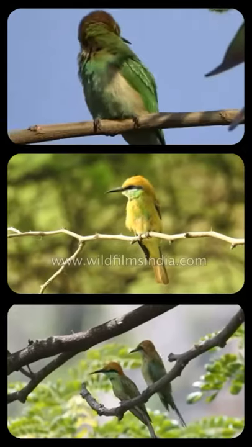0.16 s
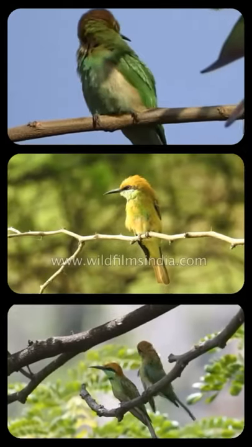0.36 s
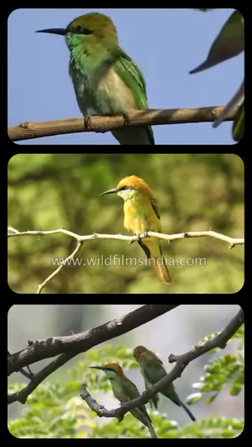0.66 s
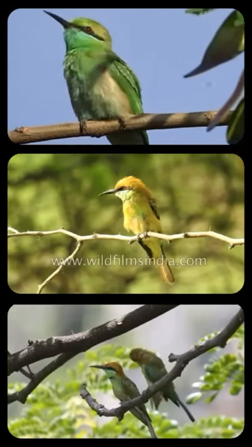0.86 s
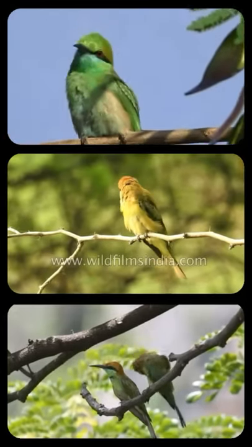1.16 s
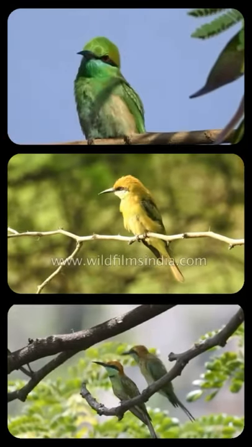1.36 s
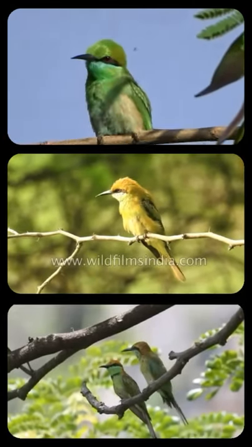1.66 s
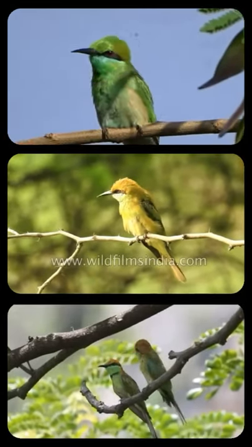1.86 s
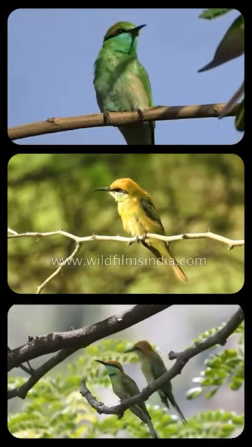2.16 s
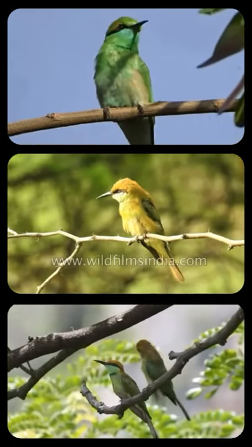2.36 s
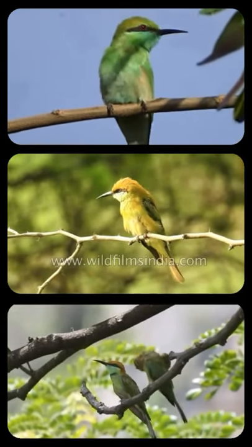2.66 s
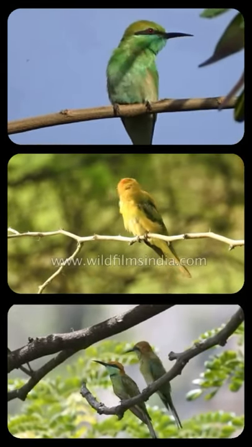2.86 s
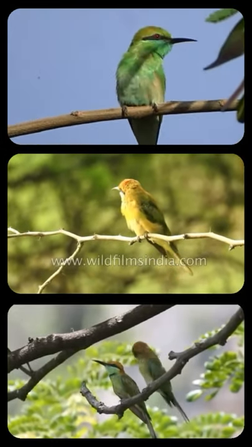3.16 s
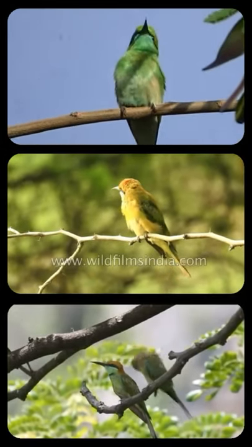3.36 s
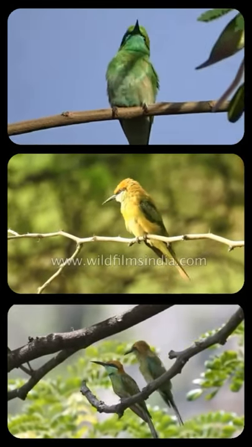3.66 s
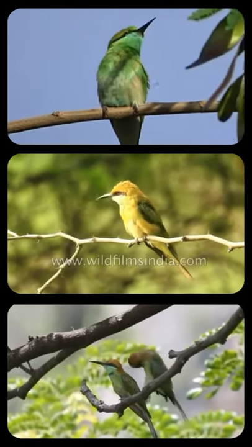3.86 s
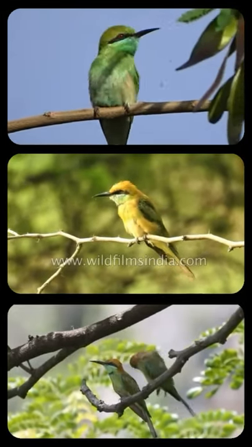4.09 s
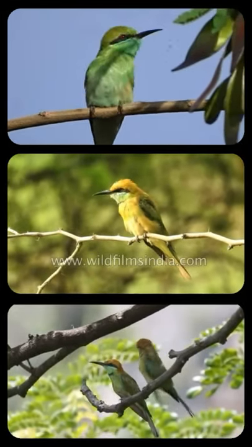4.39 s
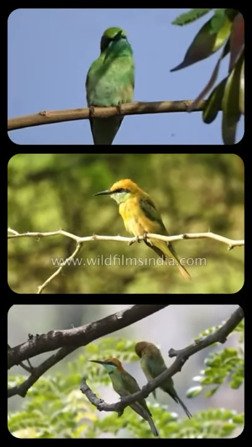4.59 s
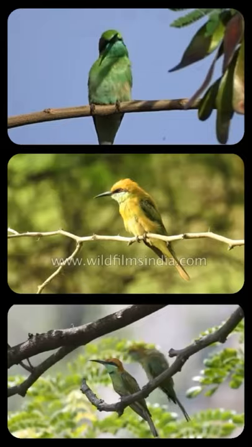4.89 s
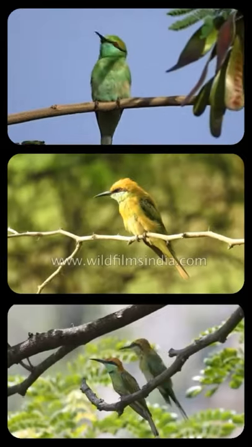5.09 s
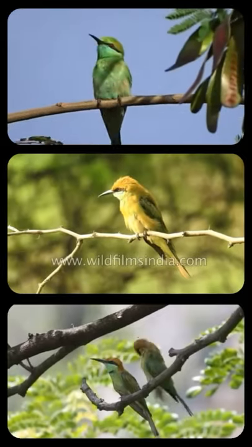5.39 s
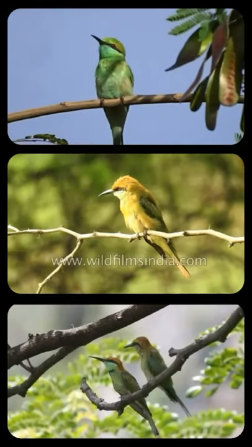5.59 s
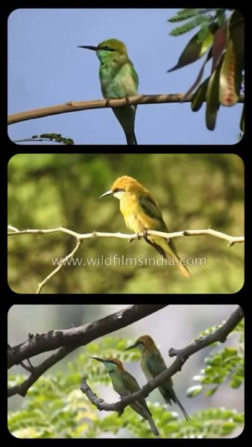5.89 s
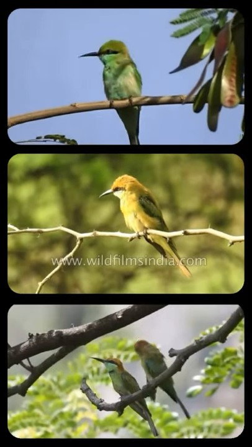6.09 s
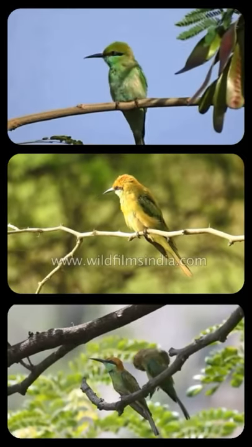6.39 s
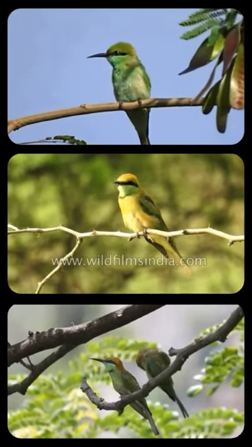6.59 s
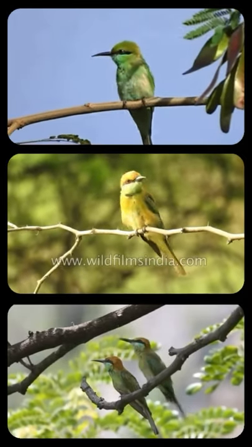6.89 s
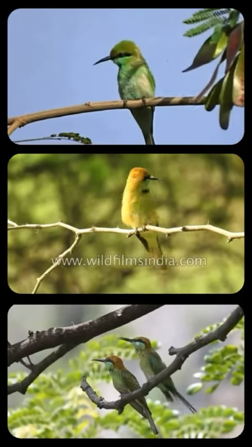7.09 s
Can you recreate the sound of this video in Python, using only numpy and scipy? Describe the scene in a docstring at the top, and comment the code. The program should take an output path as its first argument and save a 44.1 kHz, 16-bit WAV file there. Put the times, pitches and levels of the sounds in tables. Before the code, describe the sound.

An open-air grove with light echo off branches. Bright, burry whistled trills repeat in brief bursts, some overlapping fainter ones. Soft low coos sound far away at the start, and a thin arching whistle comes near the end. A twig knocks and leaves rustle briefly as the remote road noise swells, then eases a little. The centred, fairly close pickup has only faint hiss.

```python
"""Green bee-eaters call from a tree: quick trills of falling slurs that sink and fade, and a few double chips.
Each call is a wavering whistle with harmonics, shaped by the throat and blurred by echoes off branches.
Far birds coo and whistle faintly as gliding sine tones; small knocks, perhaps of a twig, and brief rustles
of leaves are short grainy noise. Distant traffic murmurs, slowly swells and eases again: shaped noise plus
a few unsteady engine tones. Under it all lies a faint hiss of smooth noise."""
import sys
import numpy as np
from scipy import signal
from scipy.fft import rfft, irfft, next_fast_len
from scipy.io import wavfile
from scipy.ndimage import uniform_filter1d, map_coordinates

SR = 44100
rng = np.random.default_rng(int(sys.argv[2]) if len(sys.argv) > 2 else 0)


def pcm_store(signal):
    """Save signal as 16-bit PCM."""
    levels = np.round(np.clip(np.atleast_2d(signal), -1, 1) * 32767)
    wavfile.write(sys.argv[1], SR, levels.astype(np.int16).T)


N = 319725
T = np.arange(N) / SR


def amp(db):
    """Turn decibels into gain."""
    return 10 ** (np.asarray(db) / 20)


def unit(x):
    """Scale a sound to rms 1."""
    return x / np.sqrt(np.mean(x ** 2) + 1e-20)


def along(points, hz):
    """Read (f/Hz, value) points at any frequency, on a log axis."""
    f, v = np.transpose(points)
    return np.interp(np.log(hz + 1), np.log(f + 1), v)


def curves(rows, t):
    """Read each column after the first at times t."""
    s, *cols = np.transpose(rows)
    return [np.interp(t, s, c) for c in cols]


def wobble(rate, size):
    """Draw a smooth random curve with `rate` random points a second."""
    knots = rng.standard_normal(2048)
    return map_coordinates(knots, [np.arange(size) * rate / SR], mode="wrap")


def filtered(x, response):
    """Multiply the spectrum of x by a function of frequency."""
    m = next_fast_len(N + 8192)
    return irfft(rfft(x, m) * response(np.fft.rfftfreq(m, 1 / SR)), m)[..., :N]


def add(track, s, x):
    """Mix x into the track from time s, cutting off what lies outside."""
    i = round(s * SR)
    x = x[max(-i, 0):N - i]
    track[max(i, 0):][:len(x)] += x


def bee_eaters():
    """All trills and chips, each with its own random set of branch echoes."""
    # trills: t/s, length/s, level/dB, pitch/Hz, effort (0 to 1), echo level against the voice/dB
    trills = [ (-.11, .13, -23.5, 2993, 0.42, -8.5), (.066, 0.12, -40, 3436, 0.1, -1),
              (.134, 0.11, -27.5, 3150, 0.81, -5), (0.285, 0.12, -35, 3472, 0.28, -2),
              (0.514, 0.11, -29.5, 3360, 0.23, -2.5), (.717, 0.14, -28.5, 3350, 0.3, 2),
              (0.983, 0.13, -28, 3380, 0.33, -2.5), (1.189, .12, -26, 3453, 0.31, -5),
              (1.273, 0.068, -34, 3860, 0.43, 8), (1.308, 0.14, -25.5, 3436, 0.56, 0),
              (1.477, 0.08, -26.5, 3445, 0.31, -4.5), (1.992, 0.14, -20, 3203, 0.98, -12),
              (2.85, .235, -25, 3554, 0.85, -9.5), (2.883, .11, -23.5, 3265, .25, -12),
              (3.16, 0.019, -37.5, 3710, 0.4, 1), (3.222, 0.14, -26.5, 3246, .7, -2),
              (3.302, .12, -34, 3200, 0.84, 5), (3.49, 0.16, -28, 3190, 0.55, -1),
              (3.545, 0.11, -29.5, 3380, 0.69, 0), (3.787, .14, -27, 3126, .7, 5),
              (3.883, 0.19, -38.5, 3020, 0, 10), (4.025, .125, -27, 3150, 0.47, 9),
              (4.07, .12, -32.5, 3310, 0.83, 10), (4.265, 0.15, -28, 3078, 0.3, 1.5),
              (4.323, .15, -32, 3247, 0.8, 3), (4.52, .2, -29, 3120, 0.61, 6),
              (4.588, 0.079, -23.5, 3744, 0.89, 2), (4.79, 0.13, -24.5, 3190, 0.64, 3),
              (5.007, 0.19, -35, 3280, 0.64, 13), (5.018, 0.13, -22.5, 3147, 0.51, 3),
              (5.234, .15, -34.5, 3373, 0.43, 9), (5.253, 0.11, -21.5, 3094, 0.46, 1.5),
              (5.462, .165, -25, 3120, .8, 6), (5.678, .15, -26.5, 3638, 0.53, 6),
              (5.688, .15, -30, 3234, .7, -3), (5.902, 0.13, -25.5, 3202, 0.44, 1.5),
              (6.11, 0.12, -25.5, 3208, .6, -1), (6.99, .16, -25, 3580, 0.78, -6.5), ]
    # double chips: t/s, low note length/s, level/dB, pitch/Hz, echo level against the voice/dB
    chips = [(1.568, .012, -25, 3130, -7.5), (1.651, 0.011, -24, 3180, -10.5),
             (6.713, .017, -27, 3476, -7.5)]
    out = np.zeros(N)
    for s, length, db, hz, effort, echo_db in trills:
        voice = trill(length, hz, np.clip(effort, .05, 1))
        add(out, s, amp(db) * branches(voice, echo_db))
    for s, low_s, db, hz, echo_db in chips:
        add(out, s, amp(db) * branches(chip(low_s, hz), echo_db))
    return out


def trill(length, hz, effort, attack=0.0024, release=0.0065):
    """One long slur, then quick ones; effort makes them taller, harsher for longer, and sink and fade more."""
    t = np.arange(int(length * SR)) / SR

    # the opening slur lasts 35 ms, or 29 % of a short call; effort spreads the later ones out
    first = min(.035, .29 * length)
    soft_gap_s, effort_gap_s = .0115, .0085
    gaps = (soft_gap_s + effort_gap_s * effort) * (1 + .05 * rng.standard_normal(24))
    starts = np.cumsum(np.append([.002, first], gaps))
    which = np.maximum(np.searchsorted(starts, t) - 1, 0)

    # each slur differs a little by chance, in loudness and in pitch
    chance = rng.standard_normal((2, len(starts)))[:, which]
    accent, scatter = uniform_filter1d(chance, size=64, axis=1)

    # between slurs the voice flicks down, weakest just before it rises again
    flick_s, flick_hz = .0024, 2000
    since = np.maximum(t - starts[which] - flick_s, 0)
    to_joint = np.abs(t[:, None] - starts).min(axis=1)
    joint = np.exp(-(to_joint / flick_s) ** 3)
    to_pause = np.abs(t[:, None] + flick_s - starts[1:]).min(axis=1)
    pause = np.exp(-(to_pause / flick_s) ** 2)
    harsh_s = .14  # length of the harsh opening at full effort
    force = np.exp(-(t / (harsh_s * effort)) ** 4)
    flick = joint * force

    # as the air pressure runs out, the slurs get lower, shallower and softer
    steady_share, spent_hz = 0.33, 2633  # share of the call before it sinks; where full effort sinks to
    spent = np.clip((t / length - steady_share) / (1 - steady_share), 0, 1)
    foot = hz + (spent_hz - hz) * effort * spent ** 1.3 + 45.5 * scatter
    hold_s, fade_db_per_s = 0.08, 118  # the level holds, then fades this fast at full effort
    fade_db = fade_db_per_s * effort * np.maximum(t - hold_s, 0)

    # each slur drops steeply and levels out on its foot; later slurs of higher voices glide longer
    first_fall_s, fall_s_at_3200_hz = .0048, .0065
    glide = np.where(t > first, fall_s_at_3200_hz * (hz / 3200) ** 4, first_fall_s)
    # once the harsh opening is over, the slurs shrink to a fine buzz
    height = (830 + 400 * effort) * (.7 + 0.34 * force)
    slur = foot + height * np.exp(-1.5 * spent - (since / glide) ** 1.296)
    pitch = slur + (flick_hz - slur) * flick

    gate = np.clip(t / attack, 0, 1) * np.clip((length - t) / release, 0, 1)
    level_db = -4.5 * joint - 4 * pause + 1.5 * accent - fade_db
    rasp_db = -35 + 16 * flick  # the flicks of the harsh opening are the raspiest
    return syrinx(pitch, octave_db=-11.5, rasp_db=rasp_db) * gate * amp(level_db)


def chip(low_s, hz, turn=0.00288, break_hz=2200, break_db_per_s=2600, attack=0.01, release=0.0052):
    """A rising low note and a falling high one; in the break between them the voice drops and dies away."""
    leap_ratio, leap_s, high_s = 1.39, .031, .01  # the high note: pitch ratio, delay, length
    rise_hz_per_s, sag_hz_per_s = 29000, 58000
    length = leap_s + high_s
    t = np.arange(int(length * SR)) / SR
    low = hz + rise_hz_per_s * (t - low_s / 2)
    high = hz * leap_ratio - sag_hz_per_s * (t - leap_s)
    note = np.where(t < (low_s + leap_s) / 2, low, high)
    # time to the nearer edge of the break, zero outside it
    into_break = np.maximum(np.minimum(t - low_s, leap_s - t), 0)
    pitch = note + (break_hz - note) * np.minimum(into_break / turn, 1)
    gate = np.clip(t / attack, 0, 1) * np.clip((length - t) / release, 0, 1)
    return syrinx(pitch, octave_db=-4, rasp_db=-30) * gate * amp(-break_db_per_s * into_break)


def syrinx(pitch, octave_db, rasp_db, jitter=0.0142):
    """The voice organ: an unsteady, raspy whistle whose harmonics sweep through the throat resonance."""
    # throat and open bill pass the whistle and damp what lies above and below: f/Hz, level/dB
    throat = [(1800, -11.5), (2400, -8.5), (3000, -2), (4400, -4), (5300, -10.5), (6400, -16), (8000, -20),
              (9800, -24), (12000, -33)]
    n = len(pitch)
    phase = 2 * np.pi * np.cumsum(pitch * (1 + jitter * wobble(707, n))) / SR
    tone = np.zeros(n)
    for k in range(1, 4):
        harmonic_db = octave_db * np.log2(k) + along(throat, k * pitch)
        tone += amp(harmonic_db) * np.sin(k * phase)
    # rasp: the same whistle with its strength shaken at random
    rasp = amp(rasp_db) * wobble(2900, n) * (np.sin(phase) + 0.69 * np.sin(2 * phase))
    return (tone + rasp) * amp(.6 * wobble(300, n))


def branches(x, echo_db, spread=.035, t60=0.12, count=90):
    """The voice plus copies scattered off nearby branches, at rms 1 over the length of the call."""
    delay = .002 + spread * rng.random(count)
    strength = rng.standard_normal(count) * amp(-60 * delay / t60)  # later echoes are weaker
    taps = np.bincount((delay * SR).astype(int), strength)
    echo = signal.fftconvolve(x, taps)
    both = unit(np.pad(x, (0, len(echo) - len(x)))) + amp(echo_db) * unit(echo)
    return unit(both) * np.sqrt(len(x) / len(both))


def far_birds():
    """From deeper in the trees: a faint arching whistle and a few soft, low coos, all wavering sine tones."""
    # points along the whistle: t/s, f/Hz, level/dB
    whistle = [(6.44, 2950, -66), (6.52, 3400, -53), (6.6, 3750, -58), (6.68, 3950, -55), (6.78, 3950, -53),
               (6.84, 3250, -57), (6.9, 2400, -66)]
    # coos: t/s, length/s, peak level/dB, f/Hz
    coos = [(.19, 0.12, -43.5, 445), (0.465, 0.13, -41.5, 424), (0.598, 0.1, -39.5, 453)]
    out = np.zeros(N)
    t = np.arange(whistle[0][0], whistle[-1][0], 1 / SR)
    hz, db = curves(whistle, t)
    phase = 2 * np.pi * np.cumsum(hz * (1 + .02 * wobble(400, len(t)))) / SR
    add(out, t[0], amp(db + 4 * wobble(45, len(t))) * np.sin(phase))
    for s, length, db, hz in coos:
        n = int(length * SR)
        phase = 2 * np.pi * np.cumsum(hz * (1 + 0.033 * wobble(27, n))) / SR
        add(out, s, amp(db) * np.hanning(n) * np.sin(phase))
    return out


def grove(x, t60=0.49):
    """The diffuse answer of the surrounding trees: a dying tail of random echoes."""
    tail = rng.standard_normal(SR // 2) * amp(-60 * T[:SR // 2] / t60)
    return signal.fftconvolve(x, tail / np.linalg.norm(tail))[:N]


def knocks_and_rustles(slope_db=9):
    """Small knocks, perhaps of a twig, and brief rustles of leaves: short grainy noise around a centre pitch."""
    # the shortest rows are the knocks, the others rustles:
    # middle t/s, length at half height/s, level at the middle/dB, brightness (centre) f/Hz
    bursts = [(2.374, 0.039, -46.5, 1400), (4.737, 0.008, -41.5, 1600), (5.784, 0.0089, -32.5, 990),
              (5.882, 0.053, -44, 5740), (6.026, 0.074, -37.5, 5185), (6.084, 0.047, -34, 2390),
              (6.152, 0.32, -48.5, 6000), (6.418, 0.32, -51.5, 5170), (7.166, 0.12, -47, 6100)]
    out = np.zeros(N)
    for s, length, db, hz in bursts:
        n = int(2 * length * SR)
        octaves = np.log2((np.fft.rfftfreq(n, 1 / SR) + 1) / hz)
        grains = rng.standard_normal(n) * amp(2.5 * wobble(600, n))
        # weaker by slope_db for each octave away from the centre
        burst = irfft(rfft(grains) * amp(-slope_db * np.abs(octaves)), n)
        add(out, s - length, amp(db) * np.hanning(n) * unit(burst))
    return out


def traffic():
    """A distant road: low drone and tyre roar from shaped noise, and wavering engine tones."""
    # loudness over time, before the small trims below: t/s, drone level/dB, tyre roar level/dB
    swell = [(0, -46, -48.5), (1.9, -45.5, -48), (4.4, -43.5, -46.5), (5.1, -43, -43), (5.7, -44, -37.5),
             (6.05, -44.5, -41), (7.25, -45, -39)]
    # noise colours, only the shape counts: f/Hz, level per Hz/dB
    drone = [(20, -14.5), (55, -16), (120, -20), (170, -11), (290, -11), (380, -5), (540, 0.5), (720, -7.5),
             (900, -8.5), (1300, -37.5)]
    tyres = [(550, -20), (800, -5), (1050, 1), (1400, -2.5), (1600, -8), (2200, -12), (6000, -37)]
    # far engine tones: start t/s, end t/s, f/Hz, peak level/dB
    hums = [(0, 2.6, 81.7, -64), (0, 5.7, 170, -66.5), (2.2, 5.4, 360, -57), (0, 4.6, 562.5, -55.5),
            (5.6, 22, 397.3, -52.5), (5.6, 10.8, 525, -46.5)]
    drone_db, tyre_db = curves(swell, T)
    out = amp(drone_db - .5) * noise(drone, patchy_db=0.4)
    out += amp(tyre_db + 1.0) * noise(tyres, patchy_db=3.5)
    for start, end, hz, db in hums:
        gate = np.clip((T - start) / 0.32, 0, 1) * np.clip((end - T) / 0.1, 0, 1)
        phase = 2 * np.pi * np.cumsum(hz * (1 + 0.00505 * wobble(11, N))) / SR
        out += amp(db + 1.25 * wobble(5.7, N)) * gate * np.sin(phase)
    return out


def noise(spectrum, patchy_db):
    """Noise of rms 1 with patches of random gain over time and frequency."""
    z = signal.stft(rng.standard_normal(N), nperseg=2048)[2]
    field = uniform_filter1d(rng.standard_normal(z.shape), size=4, axis=0)
    field = uniform_filter1d(field, size=8, axis=1)
    x = signal.istft(z * amp(patchy_db * unit(field)), nperseg=2048)[1][:N]
    return unit(filtered(x, lambda hz: amp(along(spectrum, hz))))


def hiss(spectrum):
    """Smooth, steady noise of rms 1, coloured by the spectrum."""
    return unit(filtered(rng.standard_normal(N), lambda hz: amp(along(spectrum, hz))))


def scene():
    """Everything sits in the centre; only a thin, high hiss is wide, with opposite sign left and right."""
    # colour of the central hiss, only the shape counts: f/Hz, level per Hz/dB
    air = [(1500, -11), (3300, 8.5), (5000, 0), (8000, -3), (14000, -6)]
    birds = bee_eaters() + far_birds()
    birds = birds + amp(-19) * grove(birds)
    centre = birds + traffic() + knocks_and_rustles() + amp(-58.0) * hiss(air)
    width = amp(-64.5) * hiss([(3000, -60), (5000, -11), (7000, -0.5), (14000, -6.5)])
    return np.array([centre + width, centre - width])


def record(dry):
    """The recorder keeps nothing above its band limit."""
    top_hz = 14400
    return filtered(dry, lambda hz: hz < top_hz)


dry = scene()
out = record(dry)
pcm_store(out)
```